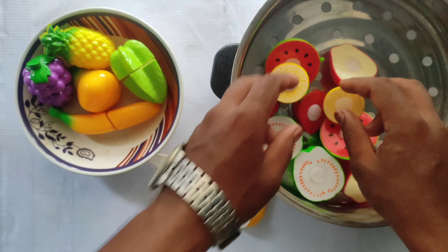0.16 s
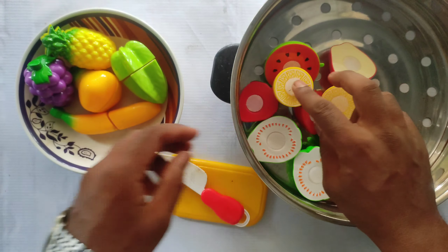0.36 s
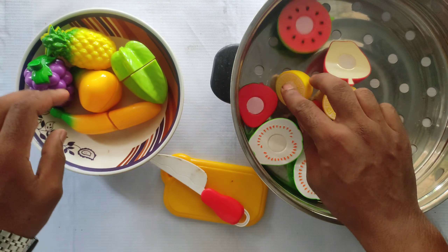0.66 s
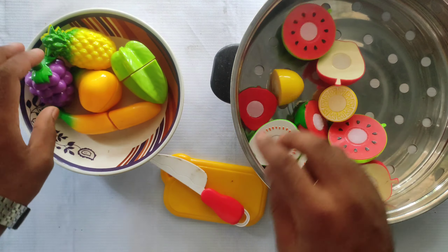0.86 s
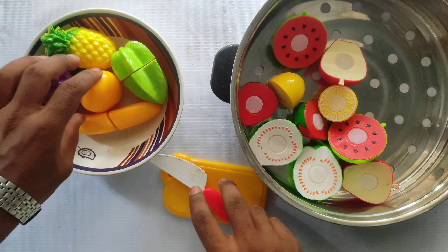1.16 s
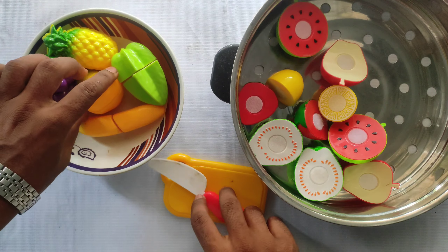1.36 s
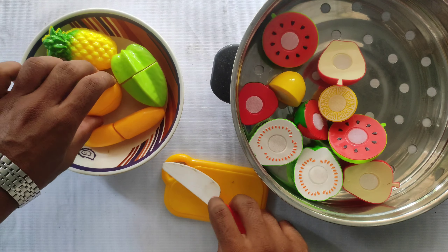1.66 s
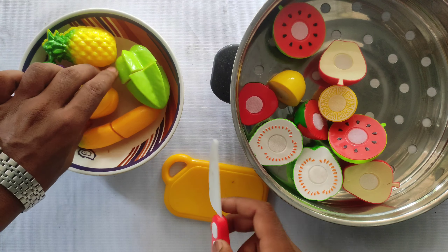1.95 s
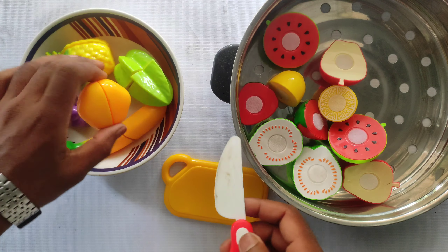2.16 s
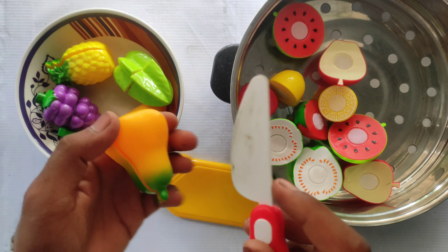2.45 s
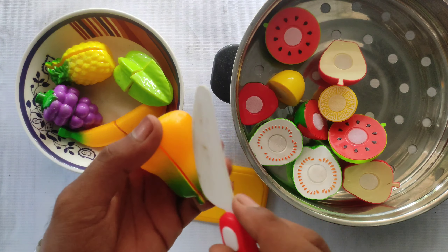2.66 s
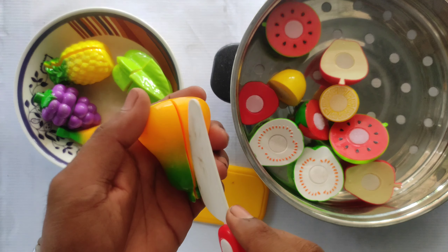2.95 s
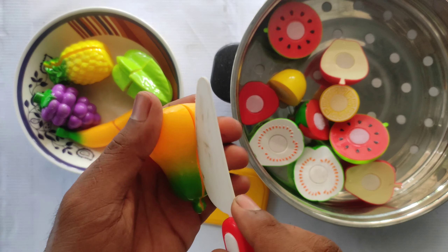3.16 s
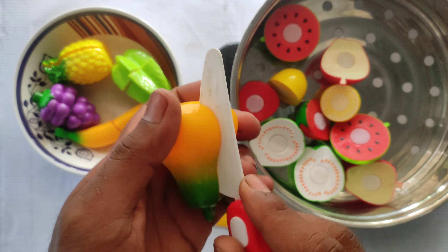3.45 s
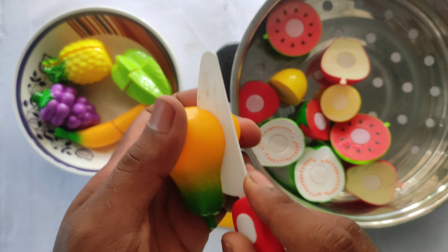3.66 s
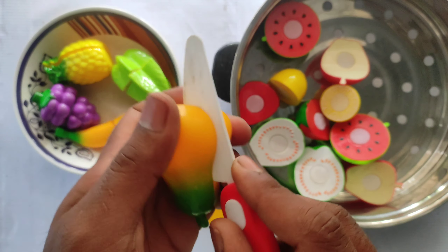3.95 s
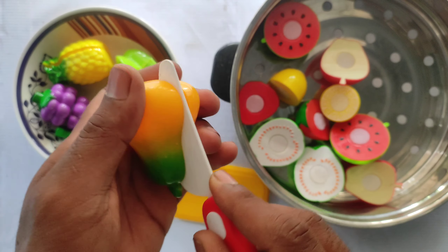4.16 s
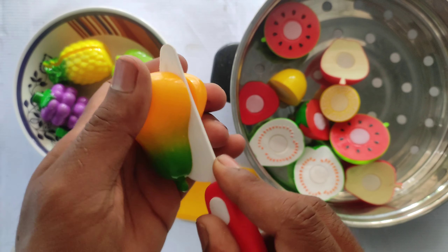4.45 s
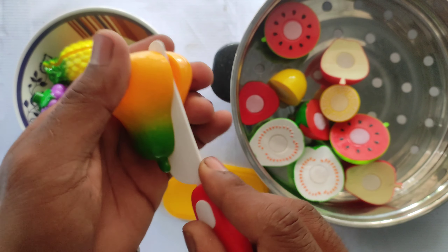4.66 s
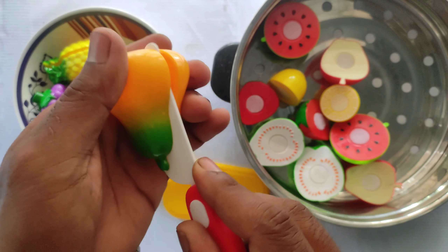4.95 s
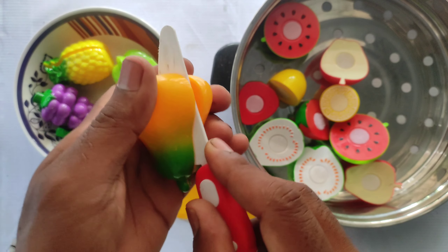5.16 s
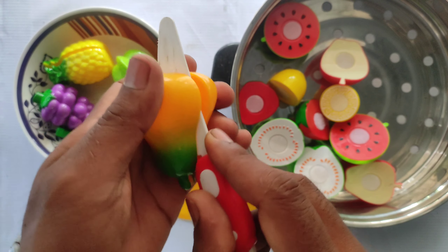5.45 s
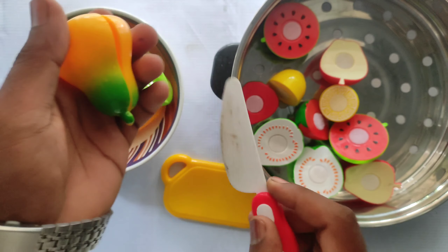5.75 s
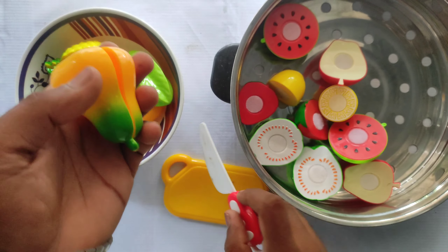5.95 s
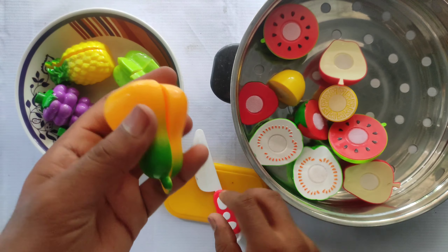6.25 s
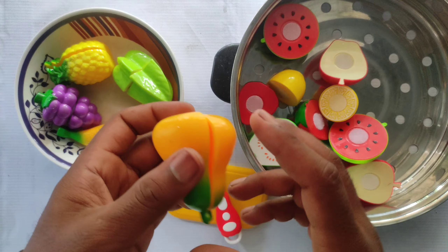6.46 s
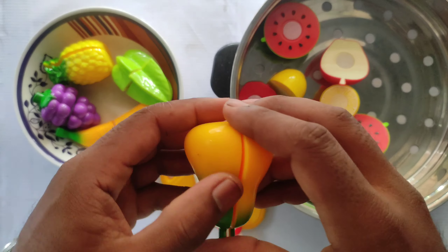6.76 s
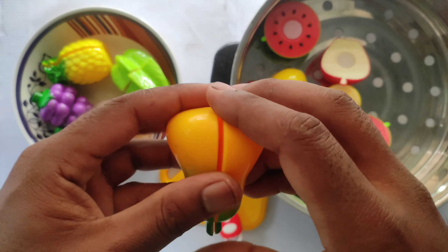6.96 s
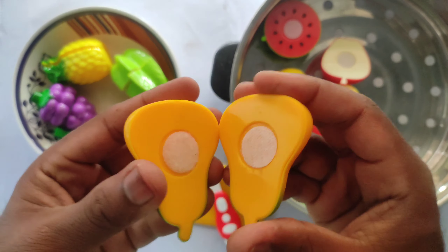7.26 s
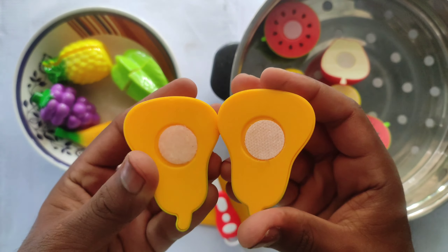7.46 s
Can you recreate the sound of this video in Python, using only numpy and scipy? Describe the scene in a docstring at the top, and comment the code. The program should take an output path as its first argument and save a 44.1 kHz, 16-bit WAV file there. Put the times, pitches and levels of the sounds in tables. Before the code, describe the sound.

Close up in a small room, hollow plastic fruit clatters into a steel pan with a faint metallic ring. Light taps and scuffs follow on a plate, then a sharp click of a toy blade on a plastic pear. Quick, even sawing rasps over hook-and-loop, the knife knocks onto its board, and after a quiet gap the joint rips open sharply. Faint birds and fan hum behind.

```python
"""Small room, phone close to the table: plastic toy fruit drops into a steel pan and is handled on a plate.
A toy knife taps and saws a toy pear, then drops on its board; the pear's hook-and-loop joint is ripped apart.
Contacts are pushes and noise chatter through resonant bodies; sawing and tearing are trains of tiny snaps.
Heavy blows boom in the table. Behind: filtered-noise air, a fan's sine hum, gliding-sine birds outside."""
import sys
import numpy as np
from scipy import signal
from scipy.fft import rfft, irfft, next_fast_len
from scipy.io import wavfile
from scipy.ndimage import map_coordinates

SR = 44100
rng = np.random.default_rng(int(sys.argv[2]) if len(sys.argv) > 2 else 0)


def generate_wav(signal):
    """Clip the signal to [-1, 1] and save it as 16-bit WAV at the path in sys.argv[1]."""
    frames = np.transpose(np.atleast_2d(signal))
    scaled = np.clip(frames, -1, 1) * 32767
    pcm = np.round(scaled).astype(np.int16)
    wavfile.write(sys.argv[1], SR, pcm)


N = 335601
T = np.arange(N) / SR

# Levels are relative: each source's gain and its paths to the microphones come on top.
# Contacts with each object: start_s, middle_band_db, knock_db and click_db (re middle band)
PAN_HITS = [(0.0265, -24, -6.5, -5), (0.0458, -13, -15, -11), (0.0559, -35, 2, 7),
            (0.0855, -27, -4.5, -4.5), (0.158, -45.5, 5, 7.5), (0.288, -49.5, 8.5, 1.5),
            (0.5252, -47, -9, 5), (0.5865, -21, -8.5, -1.5), (0.595, -21, -3.5, -7), (0.6046, -25, -10, -4),
            (0.7403, -43, -7, -1), (0.757, -28, -13, -4), (0.8723, -42.5, 2, 3.5)]
PLATE_HITS = [(1.262, -50, 6.5, -10.5), (1.3122, -42.5, -1, -5), (1.4032, -36.5, -19, -6),
              (1.5173, -57.5, -15, 11), (1.7791, -34.5, 0.5, -29), (1.792, -41, -7, -7.5),
              (1.886, -43.5, -7.5, -0.5), (1.9335, -44, -11, -3), (1.9995, -38, 3, -26),
              (2.0164, -34, -18, -7.5), (2.0865, -21.5, -21, -10), (2.134, -40.5, 1.5, -4),
              (2.3328, -28, -17, -4.5)]
PEAR_HITS = [(2.6409, -15, -18, -3), (3.467, -37.5, -23, -1), (3.7009, -46, -6.5, 0), (3.923, -50, -6, 3),
             (3.9509, -44.5, -5.5, 0.5), (4.4139, -41.5, -27, 2), (4.5441, -39, -25, -2.5),
             (4.5824, -45, -14, 2), (4.6014, -45, -5, -1), (4.8109, -40.5, -11, 3.5),
             (4.9608, -37, -24, -4), (5.451, -39.5, -5.5, 2), (5.7184, -43.5, -5.5, 6),
             (7.0428, -50, -5, -3), (7.1881, -32.5, -11, -5.5)]
HOLLOW_HITS = [(2.9825, -39.5, -12, -28), (3.1462, -30.5, -6.5, -12), (3.4145, -31, -2, -6)]
BOARD_HITS = [(6.1122, -16, -2, -12.5), (6.1577, -18, 1.7, -10.5), (6.1674, -23.5, -0.5, -7.5)]
# Broad colour of each object (HOLLOW: a fruit's hollow shell): freq_hz, gain_db
PAN_COLOUR = [(180, -22), (300, -5), (430, -6), (691, -9), (1470, -7), (1590, -10.5), (2140, -9),
              (4540, -21), (7420, -22.5), (13200, -32), (15000, -54.5)]
PLATE_COLOUR = [(240, -46.5), (400, -12), (828, -16.5), (1330, 4.5), (1610, -7.5), (1770, -5), (2220, -18),
                (4070, -16), (13300, -34), (15000, -39)]
PEAR_COLOUR = [(150, -23), (340, -11), (520, -10), (740, -15), (1000, -12), (1350, -10), (1800, -11),
               (2400, -7), (3700, -6), (5000, -13), (6000, -8.5), (8500, -8), (9500, -15.5), (13800, -13.5),
               (15000, -37)]
HOLLOW_COLOUR = [(300, -5), (700, -10), (1050, -2), (1450, 1.5), (2100, -5.5), (3000, -11), (7000, -22.5),
                 (14000, -34)]
BOARD_COLOUR = [(100, 0), (350, -9.5), (620, -12), (950, -1.5), (1450, 0), (2000, -11.5), (2700, -20),
                (3700, -19), (5000, -23.5), (6500, -13.5), (8500, -25.5), (14000, -29)]
TABLE_COLOUR = [(22, -36.5), (50, -14.5), (85, -2.5), (200, -3), (380, -8.5), (620, -11.5), (1000, -19.5),
                (3000, -75.5)]
# Resonances above that colour, at the loudest contact: freq_hz, width_hz, peak_db
PAN_MODES = [(1110, 12, 3), (2037, 61.5, 22), (2300, 150, 19.5), (2853, 110, 10), (7170, 800, 31)]
PLATE_MODES = [(1406, 32, 3), (1872, 120, 6), (2680, 220, 12), (2970, 170, 26), (5100, 39, 4.9)]
PEAR_MODES = [(951, 75, 5.2), (1413, 370, 4.5), (2480, 200, 3.1), (3560, 100, 2.5), (4100, 270, 6)]
BOARD_MODES = [(955, 340, 1.2), (1463, 81, 5.9), (2600, 340, 2.9)]
# Resonances of the parting halves: freq_hz, width_hz, peak_db
HALF_MODES = [(2100, 20, 5), (3580, 160, 1), (3709, 10, 6), (3880, 100, 1)]
# Tones of the pan's wall: freq_hz, level_db (re the knock), t60_s
WALL_TONES = [(368, -23.5, 0.612), (520, -20, 1.4), (1128, -25.5, 1.1)]
# The table under heavy blows: start_s, level_db, t60_s, boom_hz
THUDS = [(0.047, -37.5, 1, 425), (.54, -41.5, 0.41, 354), (0.586, -30, 0.41, 182), (.757, -42.5, 0.63, 500),
         (2.02, -55, 1, 79.5), (6.113, -33.5, 0.19, 330), (6.161, -24.5, 0.33, 96)]
# Colour of the blade at the lip of the joint: freq_hz, gain_db
LIP_COLOUR = [(410, -54), (700, -17.5), (952, -14.5), (1780, -8.5), (2030, 4.5), (2370, -6.5), (3900, -1),
              (4490, -6.5), (6690, -3), (9580, -14), (12700, -8), (14100, -15), (15000, -44)]
# Colour of the blade between the halves: freq_hz, gain_db
GAP_COLOUR = [(410, -49.5), (700, -21), (940, -16.5), (1180, -14.5), (2030, -6), (2250, -3), (3220, -4),
              (3610, 2.5), (4490, -9.5), (7220, -0.5), (9580, -13.5), (13700, -6), (15000, -44.5)]
# Blade pressure, as the level of its rasp: time_s, level_db
PRESSURE = [(3.39, -52), (3.95, -44.5), (4.25, -43), (4.51, -51), (4.66, -41.5), (4.8, -42.5), (5.22, -44),
            (5.63, -43)]
# Colour of the tearing hooks: freq_hz, gain_db
HOOK_COLOUR = [(240, -66.5), (400, -43), (854, -24.5), (1020, -31), (1390, -16.5), (2390, -3), (2580, -10),
               (2700, -4.5), (3650, -3), (5430, -13.5), (6610, -7.5), (9660, -20.5), (12900, -14.5),
               (15000, -27)]
# Shoves that set the pieces in the pan jostling: start_s, end_s, level_db, rise_s, settle_s
SHOVES = [(0.028, 0.057, -31.5, 0.033, 0.57), (.55, 0.615, -30.5, 0.14, 0.072),
          (0.763, 0.77, -37, 0.092, 0.47)]
# Fruit scuffing on the plate: start_s, end_s, level_db
SCUFFS = [(1.233, 1.35, -49), (1.421, 1.517, -45.5), (1.538, 1.62, -56.5), (2.013, 2.19, -50.5),
          (2.22, 2.37, -56)]
# Faint ticking and rubbing: pieces settling in the pan (first row), then fingers over the fruit:
# start_s, end_s, level_db
TICKS_AND_RUBS = [(.92, 1.2, -66), (1.36, 1.604, -53.5), (1.74, 2.42, -53.5), (2.5, 3.3, -65)]
# Colour of that ticking and rubbing: freq_hz, gain_db
TICK_RUB_COLOUR = [(290, -32.5), (500, -1.5), (646, -11.5), (1060, -3), (2330, -10), (8250, -12.5),
                   (9250, -24.5), (14000, -17), (15000, -33.5)]
# Far bird's calls: start_s
BIRD_CALLS = [1.656, 2.398, 3.083, 3.855, 4.605, 5.355, 6.882]
# Notes of one call: delay_s, first_hz, last_hz (both detuned per note), level_db
BIRD_SONG = [(0, 1085, 757, 0.5), (0.076, 1136, 762, 4), (0.154, 1168, 900, 3), (.195, 1123, 942, -4)]
# Colour of the room air: freq_hz, gain_db
AIR_COLOUR = [(15, -23.5), (28, -5), (45, 2), (65, -6.5), (120, -11), (200, -11), (330, -18.5), (620, -25),
              (1000, -26.5), (1600, -33.5), (3500, -35.5), (5000, -40.5), (13800, -47.5), (15000, -72)]
# Tones of the fan: freq_hz, level_db
HUM = [(43.1, -56), (102.3, -56.5)]
# Left-right likeness of diffuse sound: freq_hz, likeness (0 to 1)
ALIKE = [(100, 0.85), (400, 0.79), (900, 0.4), (1600, 0.079), (10000, 0.048)]
# Decay of the room: freq_hz, t60_s
ROOM = [(120, 0.49), (400, 0.99), (1200, 0.5), (3000, 0.53), (7000, 0.44), (14000, 0.33)]

CHATTER_DB_PER_DB = 0.55  # lighter touches chatter less
SAW_START_S, STROKE_PERIOD_S, STROKE_COUNT = 3.391, 0.1407, 17
SHALLOW_STROKE_S, DEEP_STROKE_S = 0.098, 0.11
SINK_START_S, SINK_TIME_S = 3.75, 1  # the blade works in between the halves
STRAIN_START_S, STRAIN_LENGTH_S, STRAIN_DB = 6.74, 0.17, -68  # fingers take up the strain
RIP_START_S, RIP_END_S = 7.187, 7.277
RIP_END_DB, RIP_GROWTH_DB_PER_S = -25.5, 88.5  # louder as the pull builds
RIP_ATTACK_S, RIP_RELEASE_S = 0.028, 0.05  # to and from 60 dB below
TEETH_DB, TEETH_PER_S = 2.2, 330  # rows of hooks give way together
BIRD_DB = -57.5
CHIRP_START_S, CHIRP_END_S, CHIRP_DB = 1.635, 1.775, -64
CHIRP_START_HZ, CHIRP_SAG_HZ_PER_S = 4950, 6200
BAND_LIMIT_HZ = 14500


def amp(db):
    """Decibels to gain."""
    return np.exp(np.maximum(db, -300) * np.log(10) / 20)


def unit(x):
    """Scale to rms 1."""
    return x / np.sqrt(np.mean(x ** 2) + 1e-20)


def along(points, hz):
    """Read (freq_hz, value) points on a log-frequency axis."""
    f, v = np.transpose(points)
    return np.interp(np.log(hz + 1), np.log(f + 1), v)


def wobble(knots_per_s):
    """Smooth random curve."""
    knots = rng.standard_normal(int(N * knots_per_s / SR) + 4)
    return map_coordinates(knots, [T * knots_per_s])


def add(track, start_s, x):
    """Mix x into the track at start_s, cut at the track's end."""
    part = track[:, max(round(start_s * SR), 0):][:, :x.shape[-1]]
    part += x[..., :part.shape[-1]]


def coloured(x, gain):
    """Pass x through the minimum-phase filter with this gain of frequency."""
    n = x.shape[-1]
    m = 2 * next_fast_len(n // 2 + 4096)
    cepstrum = irfft(np.log(np.maximum(gain(np.fft.rfftfreq(m, 1 / SR)), 1e-6)))
    # fold the cepstrum forward in time: causal response
    cepstrum[1:m // 2] *= 2
    cepstrum[m // 2 + 1:] = 0
    response = np.exp(rfft(cepstrum))
    return irfft(rfft(x, m) * response, m)[..., :n]


def body(colour, modes=()):
    """Gain of an object over frequency: broad colour with resonances on top."""
    def gain(hz):
        peaks = sum(amp(db) ** 2 / (1 + (2 * (hz - f) / width) ** 2) for f, width, db in modes)
        return amp(along(colour, hz)) * np.sqrt(1 + peaks)
    return gain


def diffuse(n):
    """Stereo noise from all around: alike in the bass, nearly unrelated in the treble."""
    likeness = along(ALIKE, np.fft.rfftfreq(n, 1 / SR))
    turn = np.arccos(np.clip(likeness, -1, 1)) / 2
    mid, side = irfft(rfft(rng.standard_normal((2, n))) * [np.cos(turn), np.sin(turn)], n)
    return np.array([mid + side, mid - side])


def placed(x, lead_ms, pan_db, near_db, room_db):
    """Sound at two microphones: direct (left leads), scatter off hands and table, room tail."""
    t = np.arange(SR // 2) / SR
    delay_s = np.array([[0], [lead_ms / 1000]])
    direct = np.sinc((t - delay_s) * SR - 4) * amp([[pan_db / 2], [-pan_db / 2]])
    near = diffuse(len(t)) * amp(-60 * t / 0.017) * (t > 0.0004)
    hz, age_s, spectra = signal.stft(diffuse(len(t)), SR, nperseg=256)
    decay = amp(-60 * age_s / along(ROOM, hz)[:, None])
    tail = signal.istft(spectra * decay, SR, nperseg=256)[1][:, :len(t)]
    tail = tail * (1 - np.exp(-t / 0.0009))
    paths = direct + amp(near_db) * near / np.linalg.norm(near[0])
    paths = paths + amp(room_db) * tail / np.linalg.norm(tail[0])
    return signal.fftconvolve(x[None], paths, axes=1)[:, :len(x)]


def snaps(per_s, spread_db):
    """Tiny impulses of random time, sign and size, rms 1."""
    out = np.zeros(N)
    chance, size, sign = rng.random((3, N))
    hit = chance < per_s / SR
    size_db = spread_db * np.minimum(-np.log(1 - size[hit]), 3)
    out[hit] = np.sign(sign[hit] - 0.5) * amp(size_db)
    return unit(out)


def swell(t, start_s, end_s):
    """Gain that rises smoothly from nothing and falls back, as a stroke speeds up and slows down."""
    out, inside = np.zeros(len(t)), (t > start_s) & (t < end_s)
    out[inside] = np.abs(np.sin(np.pi * (t[inside] - start_s) / (end_s - start_s))) ** 0.53
    return out


def swells(rows):
    """Sum of swells from (start_s, end_s, level_db) rows."""
    return sum(amp(db) * swell(T, start_s, end_s) for start_s, end_s, db in rows)


def arch(start_s, end_s, rise_s, fall_s):
    """Gain full between two times; rise and fall run from and to 60 dB below."""
    return amp(-60 * (np.maximum(start_s - T, 0) / rise_s + np.maximum(T - end_s, 0) / fall_s))


def contacts(hits, colour, modes, t60_s, chatter, damping, gain_db, **place):
    """Sharp push and short chatter into a shell; hardness sets knock against click."""
    out, t = np.zeros((2, N)), np.arange(SR // 2) / SR
    edges = [(1800, "low"), ([1800, 5000], "band"), (5000, "high")]
    bands = [signal.butter(3, edge_hz, kind, fs=SR, output="sos") for edge_hz, kind in edges]
    loudest_db = max(hit[1] for hit in hits)
    for start_s, db, knock_db, click_db in hits:
        decay = amp(CHATTER_DB_PER_DB * (db - loudest_db) - 60 * t / t60_s)
        force = chatter * rng.standard_normal(len(t)) * decay + (t == 0)
        # light touches stay pressed on the shell and damp its resonances
        loss_db = damping * (loudest_db - db)
        shell = body(colour, [(f, width, peak_db - loss_db) for f, width, peak_db in modes])
        ring = coloured(force, shell)
        # band levels over the first 5 ms set the balance
        sizes = [np.std(signal.sosfilt(band, ring)[:SR // 200]) for band in bands]
        knock, middle, click = np.array([knock_db, 0, click_db]) - 20 * np.log10(sizes)
        hardness = body([(1400, knock), (2200, middle), (4200, middle), (6000, click)])
        add(out, start_s, amp(db + gain_db) * placed(coloured(ring, hardness), **place))
    return out


def pan():
    """Plastic fruit strikes the steel pan, exciting its broad resonances."""
    return contacts(PAN_HITS, PAN_COLOUR, PAN_MODES, t60_s=0.068, chatter=0.12, damping=3.4,
                    gain_db=-6.0, lead_ms=0.0343, pan_db=-5, near_db=1.0, room_db=-4.5)


def pan_wall():
    """Each piece's knock sets the pan's thin wall singing faintly in decaying sines."""
    out, t = np.zeros((1, N)), np.arange(SR) / SR
    rings = [amp(db - 60 * t / t60_s) * np.sin(2 * np.pi * hz * t) for hz, db, t60_s in WALL_TONES]
    for start_s, db, knock_db, _ in PAN_HITS:
        tone_db = db + knock_db + rng.normal(0, 1.3, len(WALL_TONES))
        add(out, start_s, amp(tone_db) @ np.array(rings))
    return placed(out[0], lead_ms=0.02, pan_db=3, near_db=-13, room_db=-7.5)


def plate():
    """Fruit touches the plate, exciting its resonances."""
    return contacts(PLATE_HITS, PLATE_COLOUR, PLATE_MODES, t60_s=0.065, chatter=0.25, damping=2.5,
                    gain_db=-3.5, lead_ms=0.13, pan_db=2.5, near_db=-2.5, room_db=-6.5)


def pear():
    """Blade edge clicks, the thin blade buzzing on the shell; the flat knocks the hollow shell."""
    edge = contacts(PEAR_HITS, PEAR_COLOUR, PEAR_MODES, t60_s=0.033, chatter=0.8, damping=0.029,
                    gain_db=-1.5, lead_ms=0.17, pan_db=2.5, near_db=-2.0, room_db=-8)
    flat = contacts(HOLLOW_HITS, HOLLOW_COLOUR, PEAR_MODES, t60_s=0.016, chatter=0.7, damping=0.11,
                    gain_db=-2.5, lead_ms=0.14, pan_db=0.0, near_db=-2.5, room_db=-8.5)
    return edge + flat


def rasp(hooks, start_s, length_s, depth):
    """One drag over the hooks; colour runs from the joint's lip (depth 0) to between the halves (1)."""
    t = np.arange(SR // 2) / SR
    knots_hz = np.geomspace(1200, 14000, 22)
    # grip and gap vary by stroke, and with them the resonant hollows
    grip = body(np.c_[knots_hz, 0.9 * rng.standard_normal(len(knots_hz))])
    lip, gap = body(LIP_COLOUR), body(GAP_COLOUR)

    def colour(hz):
        return lip(hz) ** (1 - depth) * gap(hz) ** depth * grip(hz)

    piece = np.roll(hooks, -round(start_s * SR))[:len(t)]
    drag = unit(coloured(piece, colour)) * swell(t, 0, length_s)
    return placed(drag, lead_ms=0.202, pan_db=2.5, near_db=0, room_db=-6.5)


def sawing():
    """Evenly paced strokes drag the blade over the hooks, lengthening as it sinks in."""
    out = np.zeros((2, N))
    hooks = snaps(per_s=2600, spread_db=0.9) * amp(1.0 * wobble(150))  # blade catches and slips
    for start_s in SAW_START_S + STROKE_PERIOD_S * np.arange(STROKE_COUNT):
        depth = np.clip((start_s - SINK_START_S) / SINK_TIME_S, 0, 1)
        length_s = SHALLOW_STROKE_S + depth * (DEEP_STROKE_S - SHALLOW_STROKE_S)
        pressure_db = np.interp(start_s, *np.transpose(PRESSURE))
        add(out, start_s, amp(pressure_db) * rasp(hooks, start_s, length_s, depth))
    return out


def board():
    """The knife drops on its board, exciting its resonances."""
    return contacts(BOARD_HITS, BOARD_COLOUR, BOARD_MODES, t60_s=0.075, chatter=0.1, damping=0.1,
                    gain_db=-5.0, lead_ms=0.094, pan_db=0.5, near_db=-2.0, room_db=-5)


def ripping():
    """The joint strains faintly; then hooks let go in a burst of snaps that ring the halves."""
    hooks = snaps(per_s=1800, spread_db=4.5) * amp(TEETH_DB * wobble(TEETH_PER_S))
    growth = amp(RIP_END_DB - RIP_GROWTH_DB_PER_S * np.maximum(RIP_END_S - T, 0))
    pull = growth * arch(RIP_START_S, RIP_END_S, RIP_ATTACK_S, RIP_RELEASE_S)
    shell = body(HOOK_COLOUR, HALF_MODES)
    tear = coloured(hooks * pull, shell) / np.std(coloured(hooks, shell))
    out = placed(tear, lead_ms=0.18, pan_db=2.0, near_db=2, room_db=-9.0)
    add(out, STRAIN_START_S, amp(STRAIN_DB) * rasp(hooks, STRAIN_START_S, STRAIN_LENGTH_S, 1))
    return out


def table():
    """Heavy blows boom in the table top, at a pitch set by where they land."""
    out, t = np.zeros((2, N)), np.arange(SR // 2) / SR
    for start_s, db, t60_s, hz in THUDS:
        boom = unit(coloured(diffuse(len(t)), body(TABLE_COLOUR, [(hz, 0.13 * hz, 9)])))
        add(out, start_s, boom * amp(db - 60 * t / t60_s) * (1 - np.exp(-t / 0.0041)))
    return out


def handling():
    """Coloured snaps: pieces scrape and settle in the pan, fingers rub fruit, fruit scuffs the plate."""
    jostle = sum(amp(db) * arch(start_s, end_s, rise_s, settle_s)
                 for start_s, end_s, db, rise_s, settle_s in SHOVES)
    scrape = unit(coloured(snaps(per_s=1800, spread_db=2.0), body(PAN_COLOUR))) * jostle
    tick_rub = unit(coloured(snaps(per_s=210, spread_db=1.5), body(TICK_RUB_COLOUR)))
    tick_rub = tick_rub * swells(TICKS_AND_RUBS)
    scuff = unit(coloured(snaps(per_s=330, spread_db=4.0), body(HOLLOW_COLOUR))) * swells(SCUFFS)
    scraping = placed(scrape, lead_ms=0.018, pan_db=1.0, near_db=-3, room_db=-2.5)
    light_touches = placed(tick_rub + scuff, lead_ms=0.17, pan_db=1.5, near_db=2, room_db=-2.0)
    return amp(-4.0) * scraping + amp(-3.5) * light_touches


def birds():
    """Sine whistles: a far bird repeats four down-slurred notes; a small one slides down once."""
    t = np.arange(int(0.046 * SR)) / SR
    song = np.zeros((1, N))
    for call_s in BIRD_CALLS:
        for delay_s, first_hz, last_hz, note_db in BIRD_SONG:
            hz = np.linspace(first_hz, last_hz, len(t)) * (1 + 0.038 * rng.standard_normal())
            note = np.sin(2 * np.pi * np.cumsum(hz) / SR) * np.hanning(len(t))
            add(song, call_s + delay_s, amp(BIRD_DB + note_db) * note)
    slide_hz = CHIRP_START_HZ - CHIRP_SAG_HZ_PER_S * (T - CHIRP_START_S) + 80 * wobble(300)
    whistle = np.sin(2 * np.pi * np.cumsum(slide_hz) / SR)
    chirp = amp(CHIRP_DB) * swell(T, CHIRP_START_S, CHIRP_END_S) * whistle
    return amp(-2.5) * placed(song[0] + chirp, lead_ms=0, pan_db=0, near_db=-6, room_db=0)


def background():
    """Room air as coloured noise; a fan's hum as sines unsteady in level and phase."""
    air = amp(-53.5) * unit(coloured(diffuse(N), body(AIR_COLOUR)))
    hum = sum(amp(db + 0.6 * wobble(4.7)) * np.sin(2 * np.pi * hz * T + 0.5 * wobble(5))
              for hz, db in HUM)
    return air + amp(1.0) * hum * amp([[1], [-1]])  # hum 2 dB louder on the left


def scene():
    """Sum of everything heard at the table."""
    struck = pan() + pan_wall() + plate() + pear() + board() + table()
    return struck + sawing() + ripping() + handling() + birds() + background()


def record(dry):
    """The phone's steep low-pass at its band limit."""
    m = next_fast_len(N + SR // 2)
    hz = np.fft.rfftfreq(m, 1 / SR)
    return irfft(rfft(dry, m) / np.sqrt(1 + (hz / BAND_LIMIT_HZ) ** 120), m)[:, :N]


dry = scene()
out = record(dry)
generate_wav(out)
```